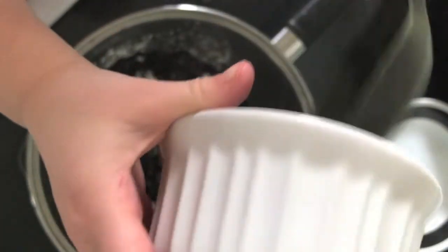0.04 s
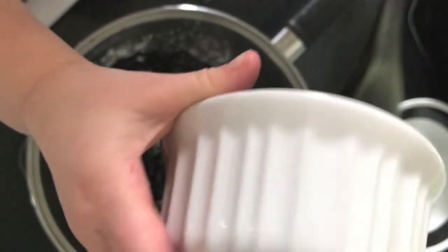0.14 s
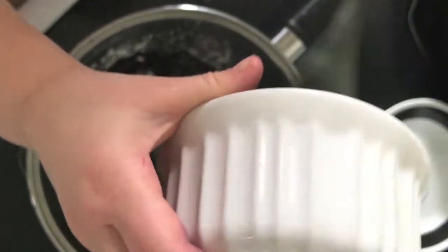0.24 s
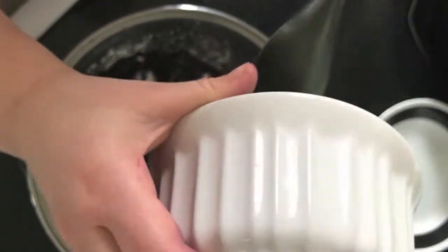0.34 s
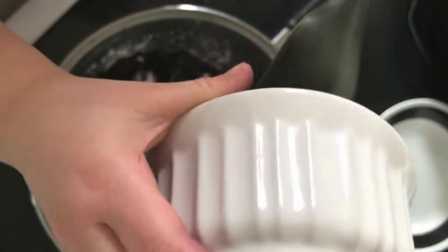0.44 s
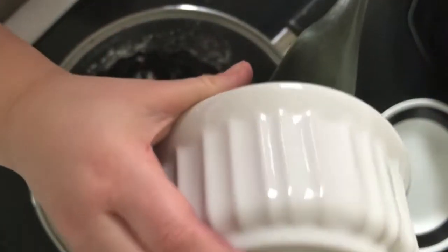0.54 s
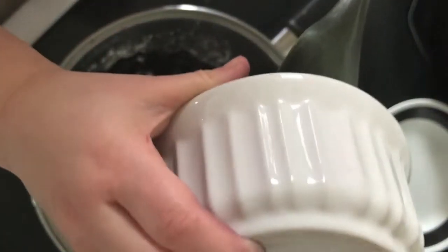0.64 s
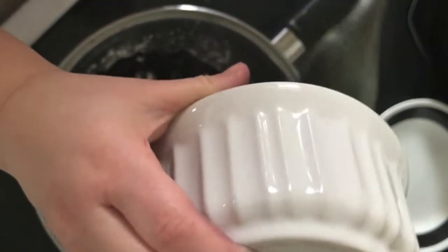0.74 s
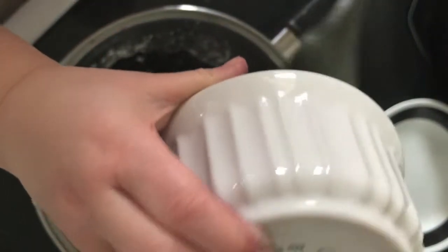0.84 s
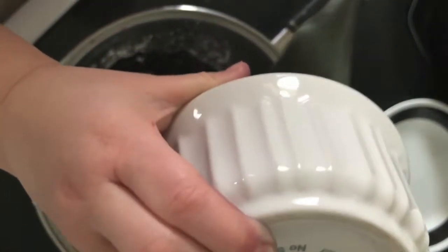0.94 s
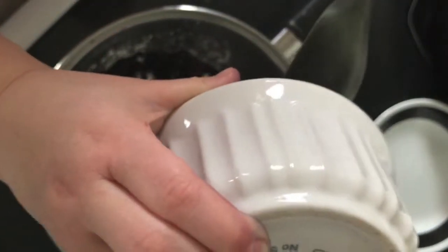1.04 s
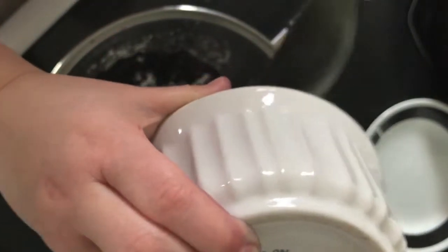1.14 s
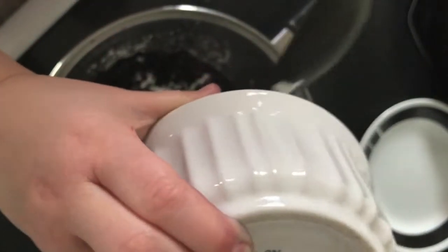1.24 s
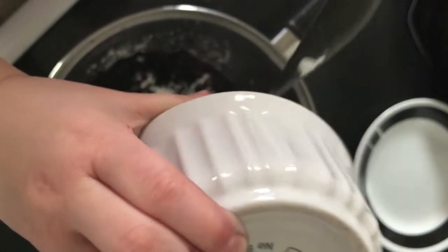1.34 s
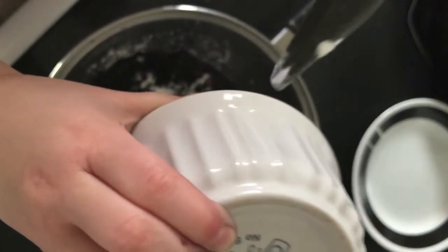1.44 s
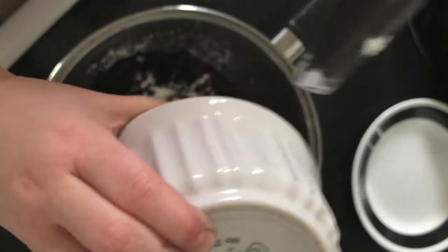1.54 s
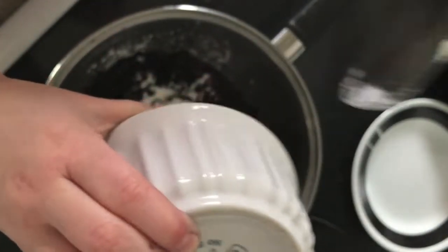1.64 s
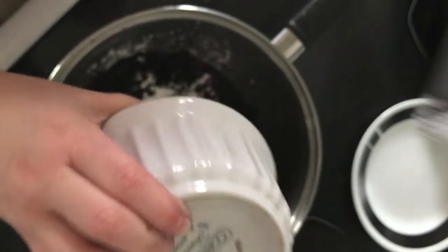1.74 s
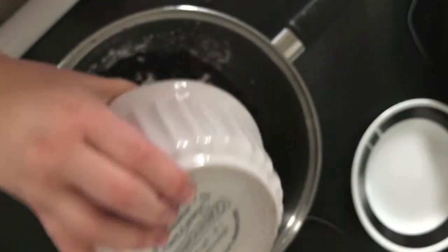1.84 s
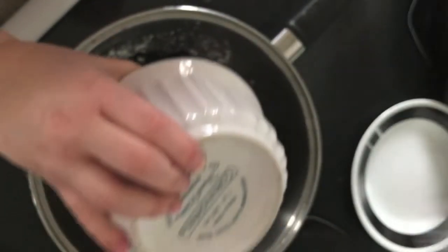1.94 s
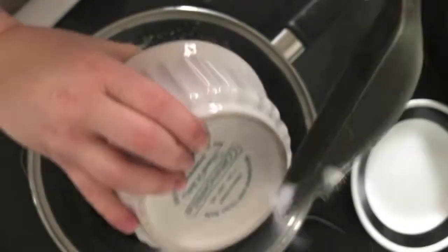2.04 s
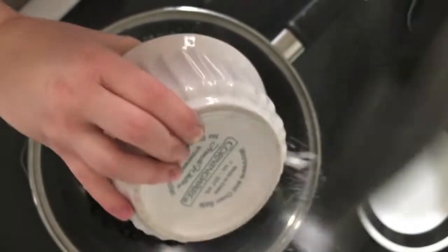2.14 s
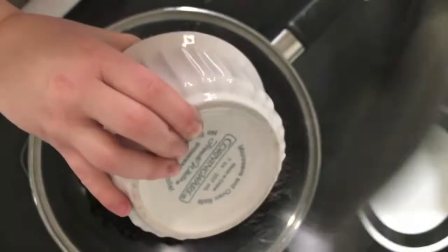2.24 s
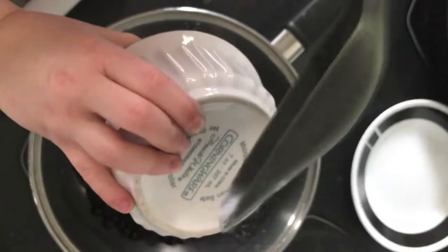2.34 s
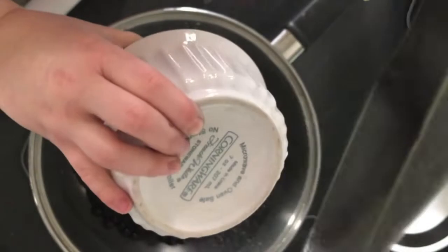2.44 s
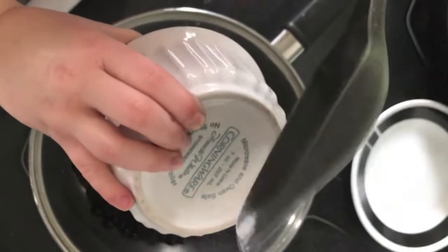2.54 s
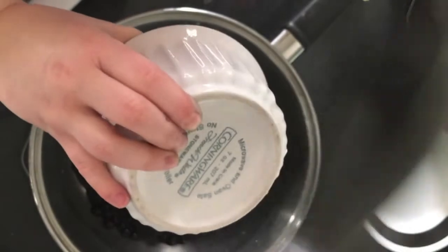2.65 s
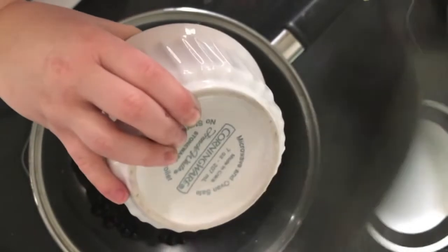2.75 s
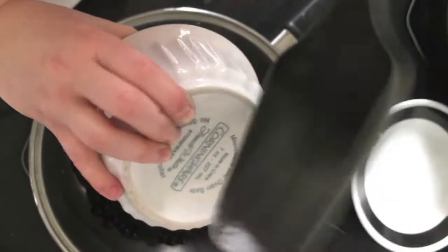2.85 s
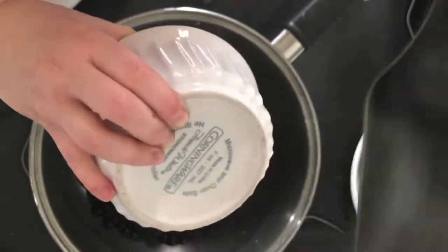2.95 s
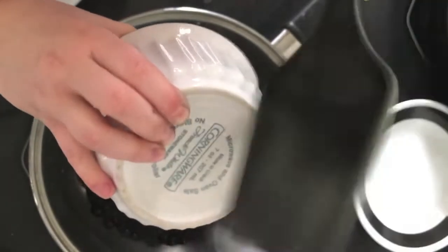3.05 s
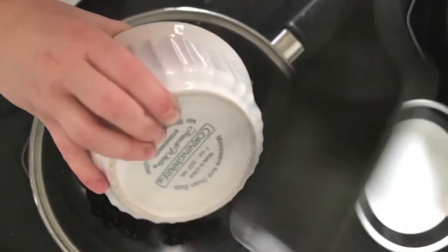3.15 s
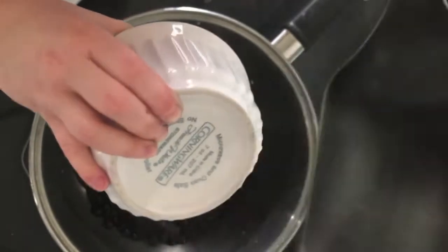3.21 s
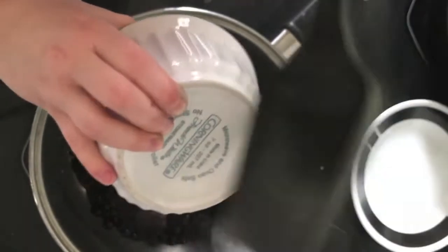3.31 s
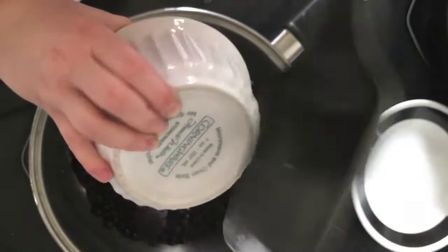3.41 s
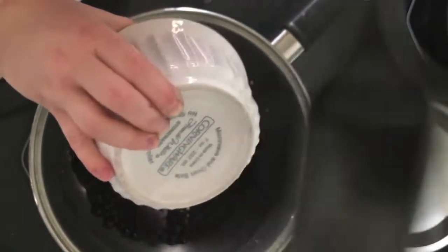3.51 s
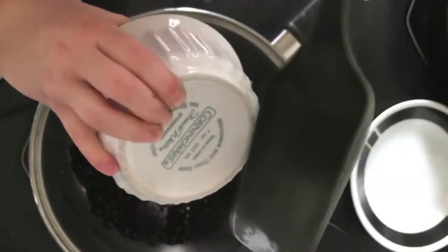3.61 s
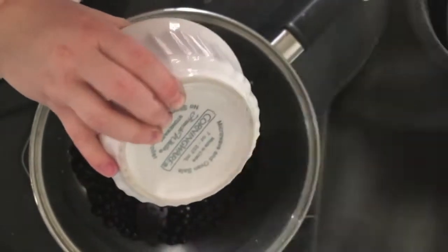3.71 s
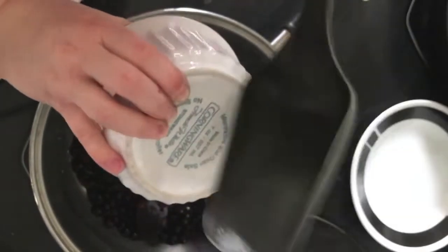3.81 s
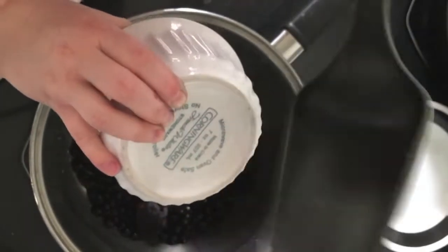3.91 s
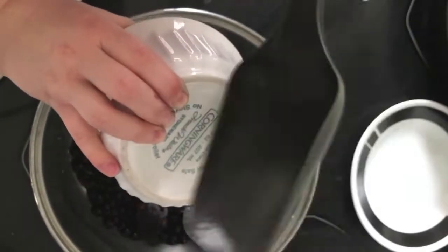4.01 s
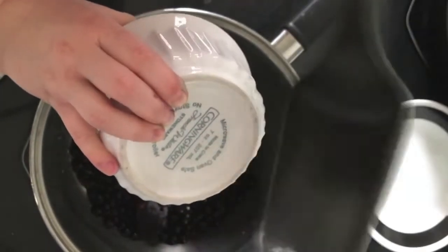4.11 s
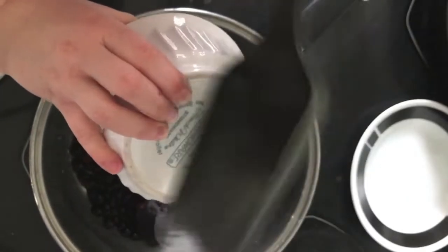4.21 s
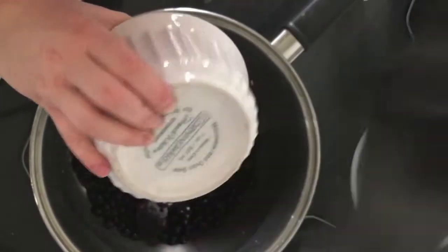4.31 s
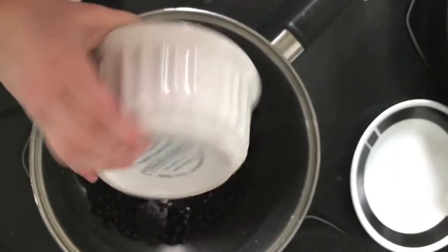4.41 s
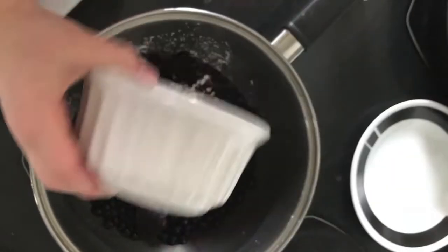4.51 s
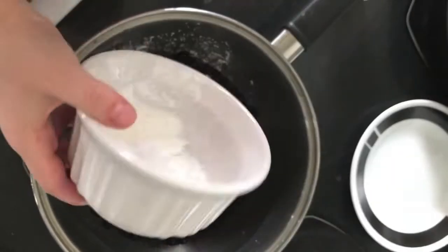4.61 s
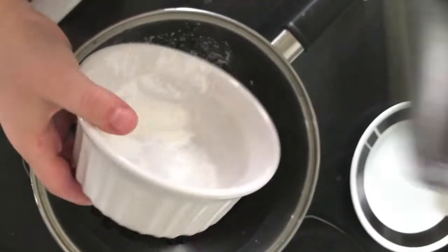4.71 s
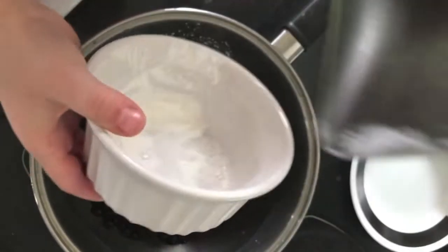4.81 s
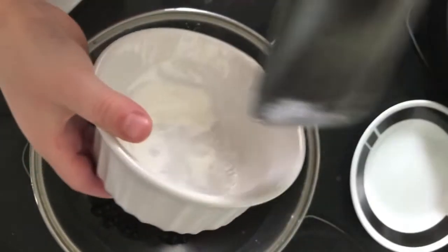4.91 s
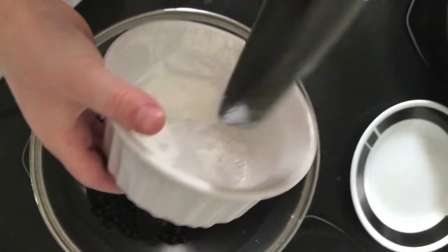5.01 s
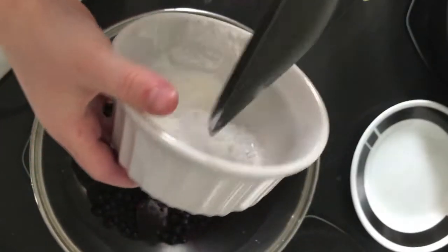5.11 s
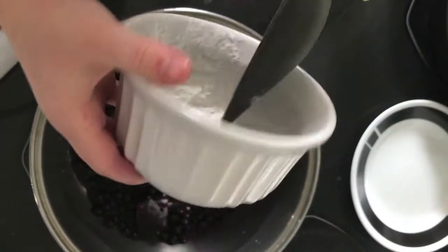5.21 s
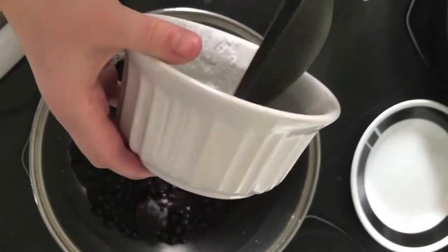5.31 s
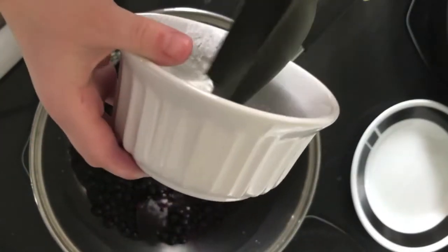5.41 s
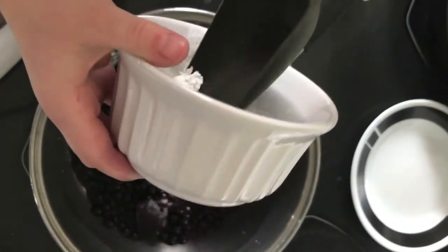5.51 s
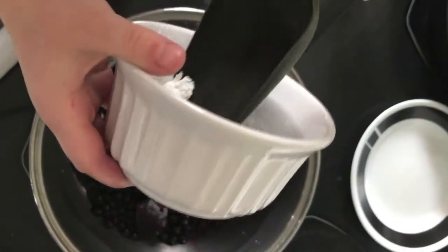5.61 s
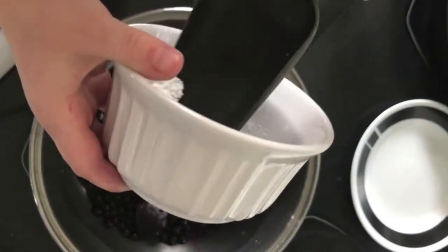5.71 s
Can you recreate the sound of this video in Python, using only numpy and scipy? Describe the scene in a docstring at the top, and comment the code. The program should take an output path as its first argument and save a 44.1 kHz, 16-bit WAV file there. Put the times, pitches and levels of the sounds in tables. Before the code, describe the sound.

Close up in a kitchen, a plastic spatula strikes a hand-held ceramic bowl: three opening knocks, the third ringing briefly, and some faint sliding on the glaze. Then comes one very hard, slightly distorted crack and a steady series of dry clacks, about four a second. After a short gap a single sharp click lands, leaving a barely audible ring. A low fan hum continues underneath, its hiss rising slightly after loud hits.

```python
"""A kitchen fan hums and a pot's ring dies away; then a plastic spatula raps the base of a ceramic
ramekin, held upside down over the pot to empty it. The gripping hand damps most blows to a dry clack;
blows near the rim let the dish ring. The close microphone overloads on every hard blow, and its noise
suppressor lets the hiss through for a moment after each."""
import sys
import numpy as np
from scipy import signal
from scipy.fft import rfft, irfft, next_fast_len
from scipy.io import wavfile
from scipy.ndimage import uniform_filter1d

SR = 44100
rng = np.random.default_rng(int(sys.argv[2]) if len(sys.argv) > 2 else 0)


def unload_audio(sound):
    """Save the sound as a 16-bit wav file, at the path given as the first command line argument."""
    columns = np.transpose(np.atleast_2d(sound))
    # keep every value between -1 and 1, then stretch to whole-number steps
    steps = np.round(np.clip(columns, -1, 1) * 32767)
    wavfile.write(sys.argv[1], SR, steps.astype(np.int16))


N = 254085
AGE = np.arange(2 ** 14) / SR   # seconds since a blow


def from_db(db):
    """Decibels to gain."""
    return 10 ** (np.asarray(db) / 20)


def rms_one(x):
    """Scale to unit rms."""
    return x / np.sqrt(np.mean(x ** 2) + 1e-20)


def fade(t60):
    """Decay envelope that drops 60 dB in t60 seconds."""
    return np.exp(-np.log(1000) * AGE / max(t60, 1e-3))


def butter(x, hz, kind, order=2):
    """Causal low- or high-pass."""
    return signal.sosfilt(signal.butter(order, hz, kind, fs=SR, output="sos"), x)


def noise(spectrum, size):
    """Unit-rms noise coloured by an EQ curve of (f/Hz, level/dB) points."""
    hz, db = np.transpose(spectrum)
    bins = np.maximum(np.fft.rfftfreq(size, 1 / SR), 1)
    eq = from_db(np.interp(np.log(bins), np.log(hz), db))
    return rms_one(irfft(rfft(rng.standard_normal(size)) * eq, size))


def struck(modes, extra_db=0):
    """A struck body: one damped sine per (f/Hz, level/dB, t60/s) mode, alternating in polarity."""
    out = np.zeros(len(AGE))
    trims_db = np.broadcast_to(extra_db, len(modes))
    for k, (hz, db, t60) in enumerate(modes):
        age = AGE[:int(2 * t60 * SR)]
        envelope = from_db(db + trims_db[k] - 60 * age / t60)
        out[:len(age)] += (-1) ** k * envelope * np.sin(2 * np.pi * hz * age)
    return out


def add(track, s, sound):
    """Mix a sound in at s seconds."""
    start = max(int(s * SR), 0)
    track[start:start + len(sound)] += sound[:N - start]


# EQ curve of the fan's air bed: f/Hz, relative level/dB
AIR_EQ = [(25, -6), (60, -6.5), (120, -2), (220, 0.5), (320, -7), (480, -14.5), (950, -16.5), (1500, -22),
          (4000, -23), (5000, -25.5), (9000, -27), (10400, -31), (12000, -26.5), (16000, -35)]
# the fan's blade tones, narrow bands of noise: f/Hz, width/Hz, level/dB
FAN_TONES = [(92, 8.5, -55), (143.9, 3.2, -50), (193.3, 4, -48.5), (218.4, 37, -51), (239.2, 10, -48.5),
             (293.5, 12, -48.5)]

def fan(mains_hz=59.7, mains_db=-43, motor_hz=239, motor_db=-43.5, air_db=-43.5):
    """Steady mains and motor hum, wavering blade tones and a bed of moving air."""
    t, size = np.arange(N) / SR, next_fast_len(N)
    bins = np.fft.rfftfreq(size, 1 / SR)
    hum = from_db(mains_db) * np.sqrt(2) * np.sin(2 * np.pi * mains_hz * t)
    hum += from_db(motor_db) * np.sqrt(2) * np.sin(2 * np.pi * motor_hz * t)
    resonances = sum(from_db(db) * rms_one(1 / (1 + ((bins - hz) / (width_hz / 2)) ** 2))
                     for hz, width_hz, db in FAN_TONES)
    blades = irfft(rfft(rng.standard_normal(size)) * resonances, size)
    air = from_db(air_db) * butter(noise(AIR_EQ, size), 52, "high", order=4)
    return hum + (blades + air)[:N]


# EQ curve of the kitchen's reflections: f/Hz, relative level/dB
ROOM_EQ = [(100, -16), (500, -1.5), (1200, -0.5), (2000, 1), (4000, -0.5), (8000, 1.5), (15000, -1)]

def kitchen(x, near_db=-13, near_t60=0.039, near_delay_s=0.0023,
            tail_db=-19, tail_t60=0.31, treble_t60=0.18, wall_delay_s=0.011):
    """Adds quick reflections from pot and hob, then the room's tail, whose treble dies first."""
    near = rms_one(noise(ROOM_EQ, len(AGE)) * fade(near_t60) * (AGE > near_delay_s))
    diffuse = noise(ROOM_EQ, len(AGE))
    low = butter(diffuse, 3300, "low", order=1)
    tail = rms_one((low * fade(tail_t60) + (diffuse - low) * fade(treble_t60)) * (AGE > wall_delay_s))
    response = (from_db(near_db) * near + from_db(tail_db) * tail) / np.sqrt(len(AGE))
    return x + signal.fftconvolve(x, response)[:N]


# partials of the lingering ring: f/Hz, level/dB
LINGER_TONES = [(840, -67), (958, -65), (1319, -65), (1561, -63)]

def lingering_ring(start_s=5.7, t60=7.0):
    """A faint ring lingers at the very end, once the dish is turned upright."""
    out, age = np.zeros(N), np.arange(N) / SR
    tones = sum(from_db(db) * np.sin(2 * np.pi * hz * age) for hz, db in LINGER_TONES)
    add(out, start_s, tones * np.exp(-np.log(1000) * age / t60))
    return out


# modes of the steel pot: f/Hz, level/dB, t60/s
POT_MODES = [(455, -44.5, 0.36), (554, -34, 0.17), (960, -35.5, 0.23), (1078, -37.5, 0.5), (1146, -32, 0.4)]

def pot():
    """The pot is still ringing from a knock as the scene opens, and dies away."""
    out = np.zeros(N)
    add(out, 0, struck(POT_MODES))
    return out


# slides on the glaze: t/s, length/s, level/dB, centre f/Hz
RUB_CUES = [(0.163, 0.064, -42, 4390), (0.787, 0.042, -48.5, 3000), (0.908, 0.24, -50.5, 3030),
            (4.433, 0.042, -38, 1240)]

def rubs():
    """Fingers and spatula slide on the glaze in brief swells of friction noise."""
    out = np.zeros(N)
    for s, length_s, db, hz in RUB_CUES:
        size = int(length_s * SR)
        band = [(hz / 8, -30), (hz * .75, -7), (hz, 0), (hz * 1.35, -7), (hz * 6, -24)]
        add(out, s, from_db(db) * noise(band, size) * np.sqrt(np.hanning(size)))
    return out


def spatula(upper_hz, give_octaves, force_db, t60=0.024, after_db=-17, after_t60=0.042):
    """The blade sounds two bending modes and a twist between them, louder the more it gives."""
    upper_db = -7 + 20.5 * give_octaves
    lower_db = upper_db - 8
    lower_hz = 1442 / 2 ** (0.56 * give_octaves)   # follows the upper mode's pitch part of the way
    twist = ((lower_hz + upper_hz) / 2, (lower_db + upper_db) / 2 - 4, t60)
    blade = struck([(lower_hz, lower_db, t60), twist, (upper_hz, upper_db, t60)])
    # hard blows also bend the handle
    handle = struck([(886, upper_db - 17 + 0.3 * force_db, 0.028)])
    # once the blade has sprung clear it rings on faintly
    after_ring = struck([(lower_hz, lower_db + after_db, after_t60),
                         (upper_hz, upper_db + after_db, after_t60)])
    return blade - handle + after_ring


# EQ curve of the contact's crack: f/Hz, relative level/dB
CRACK_EQ = [(200, -15), (950, -5), (1500, 2), (2200, -1), (4300, 6), (5000, -2), (7500, -1), (10300, -0.5),
            (12000, -1), (16000, -5)]

def crack(t60=0.005, slap_delay_s=0.0026):
    """Dense, short-lived high modes: a noise burst with a sharp front and a sizzling tail."""
    snap = from_db(2) * fade(t60=0.0022)
    # the springy blade slaps the dish again just after the first touch
    slap = from_db(-6) * np.interp(AGE - slap_delay_s, AGE, fade(t60), left=0)
    sizzle = from_db(-7.5) * fade(t60=0.018)
    return noise(CRACK_EQ, len(AGE)) * (fade(t60) + snap + slap + sizzle)


def soften(attack, give_octaves, force_db, firmness, firm_cutoff_hz=17700, light_db_per_octave=34):
    """Two-pole low-pass: a springier or lighter contact lasts longer and misses the high modes."""
    dulling_octaves = 4.37 * give_octaves - min(force_db, 0) / light_db_per_octave
    cutoff_hz = firmness * firm_cutoff_hz / 2 ** dulling_octaves
    pole = np.exp(-2 * np.pi * cutoff_hz / SR)
    return signal.lfilter([(1 - pole) ** 2], [1, -2 * pole, pole * pole], attack)


# spatula hits; the nearer its stiff neck the blade lands, the higher it rings and the shorter the
# contact: t/s, force/dB, blade f/Hz, damped base's share/dB, free wall's share/dB
BLOW_CUES = [(0.22, -14.5, 1680, -9, -8.5), (0.3541, -13, 1495, -16, -31), (0.5447, -1.5, 2140, -12, -4),
             (0.663, -31.5, 1830, 3, -16), (0.8002, -39.5, 1910, 3, -17), (1.0428, -37, 3940, -12, -34),
             (2.0943, -32, 2030, -8.5, -26.5), (2.1174, 10, 1862, -14, -20), (2.3833, 1, 1923, -2, -34),
             (2.6139, -1.5, 1947, 1.5, -32), (2.869, -4, 2500, 2, -35), (3.1247, 0, 2480, -1, -31.5),
             (3.3977, -3, 2490, 3, -45), (3.6411, 2, 2286, 1, -42), (3.8585, 0, 2504, -13, -36),
             (4.084, -7.5, 2440, -8, -28), (4.2404, -2, 2340, -11.5, -37.5),
             (4.2612, -9.5, 2000, -8.5, -20.5), (4.4421, -27.5, 2650, -12, -35),
             (5.2518, -0.5, 3900, -8.5, -35), (5.354, -23.5, 1760, 9.5, -28)]
# the blade bounces and lands again on the same spot: t/s, force relative to its blow/dB
REBOUND_CUES = [(2.662, -24), (3.1522, -5), (3.17, -18), (3.4298, -3.5), (3.4619, -18), (3.6774, -3.5),
                (4.2927, -16), (5.27, -28)]

def contacts(rebound_firmness=0.57):
    """Every blow at firmness 1, then every rebound as a weaker, duller repeat of the blow before it."""
    cues = [(*blow, 1) for blow in BLOW_CUES]
    for s, relative_db in REBOUND_CUES:
        _, force_db, *spot = max(blow for blow in BLOW_CUES if blow[0] < s)
        cues.append((s, force_db + relative_db, *spot, rebound_firmness))
    return cues


# dry clack of the hand-damped dish: f/Hz, relative level/dB, t60/s
CLACK_MODES = [(1665, -14, 0.032), (2170, -8, 0.039), (2442, -8.5, 0.037), (2530, -10, 0.0053),
               (3125, -12.5, 0.071), (3250, -7, 0.028), (3920, -13.5, .017), (4700, -13.5, 0.01),
               (4480, -12.5, 0.0037), (5330, -13.5, 0.029), (5800, -7.5, 0.018), (7360, 1.5, .009),
               (8700, -9.5, 0.033), (12900, -15, 0.029)]
# ring of the dish's free wall: f/Hz, relative level/dB, t60/s
RING_MODES = [(2080, -15.5, 0.098), (2277, -17, 0.15), (2748, 2.5, 0.14), (2630, -16.5, 0.096),
              (6400, -30, 0.2), (9800, -34, .1), (11430, -24, 0.076)]
# low thump as dish and hand recoil together: f/Hz, relative level/dB, t60/s
THUMP_MODES = [(136, -8, 0.066), (260, -3, .025), (366, -3, 0.03), (552, 0.5, .016)]

def ramekin(firm_blade_hz=2375, clack_trim_db=-2, clack_loss_db_per_octave=30, thump_trim_db=-12.5):
    """Each contact layers the dish's clack, thump and ring with a crack and the spatula's flex."""
    out = np.zeros(N)
    ring, thump = struck(RING_MODES), struck(THUMP_MODES)
    for s, force_db, blade_hz, base_db, wall_db, firmness in contacts():
        give_octaves = np.log2(firm_blade_hz / blade_hz)   # blade pitch below that of a firm contact
        spot_db = 1.5 * rng.standard_normal(len(CLACK_MODES))   # every spot favours other modes
        clack_db = clack_trim_db + base_db - clack_loss_db_per_octave * abs(give_octaves)
        clack = from_db(clack_db) * struck(CLACK_MODES, spot_db)
        attack = soften(clack + crack(), give_octaves, force_db, firmness)
        flex = spatula(blade_hz, give_octaves, force_db)
        body = from_db(thump_trim_db + base_db) * thump + from_db(wall_db) * ring
        add(out, s, from_db(force_db) * (attack + flex + body))
    return out


def scene():
    """Mono mix: blows and rubs with the kitchen's reverb, over pot, lingering ring and fan."""
    return np.array([kitchen(ramekin() + rubs()) + pot() + lingering_ring() + fan()])


def suppressor(x, threshold_db=-26.5, hold_s=0.374, depth_db=-13, corner_hz=1200):
    """A treble gate: the top end is turned down unless a sharp sound has just passed."""
    treble_power = uniform_filter1d(butter(x, 2000, "high") ** 2, size=200)
    loud = treble_power > from_db(threshold_db) ** 2
    last_loud = np.maximum.accumulate(np.where(loud, np.arange(N), -N))
    held = np.arange(N) - last_loud < hold_s * SR
    openness = uniform_filter1d(1.0 * held, size=256)
    low = butter(x, corner_hz, "low", order=1)
    return low + (x - low) * from_db(depth_db * (1 - openness))


def record(dry, cutoff_hz=16000):
    """The microphone chain: noise suppressor, hard clipping and a steep high cut."""
    clipped = np.clip(suppressor(dry[0]), -1, 1)
    high_cut = signal.ellip(10, .1, 80, cutoff_hz, fs=SR, output="sos")
    return np.array([signal.sosfilt(high_cut, clipped)])


dry = scene()
out = record(dry)
unload_audio(out)
```